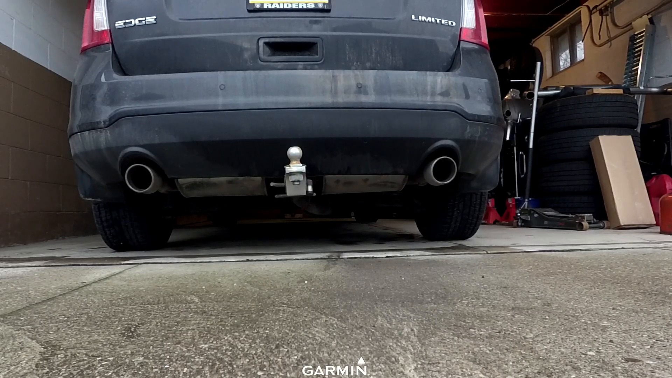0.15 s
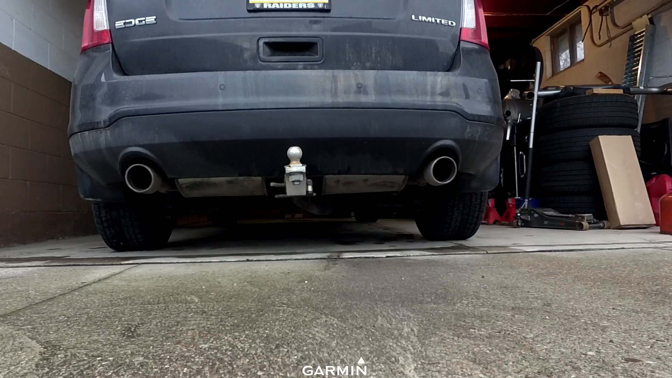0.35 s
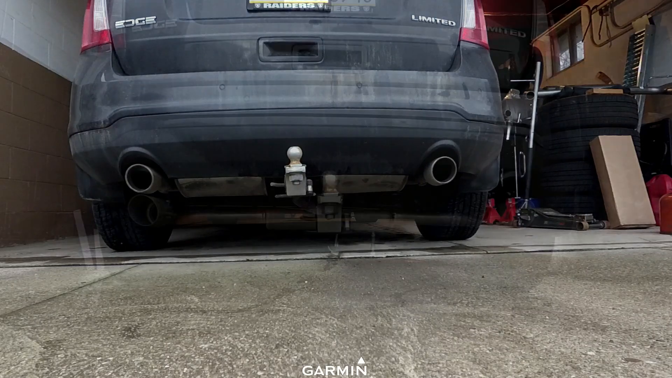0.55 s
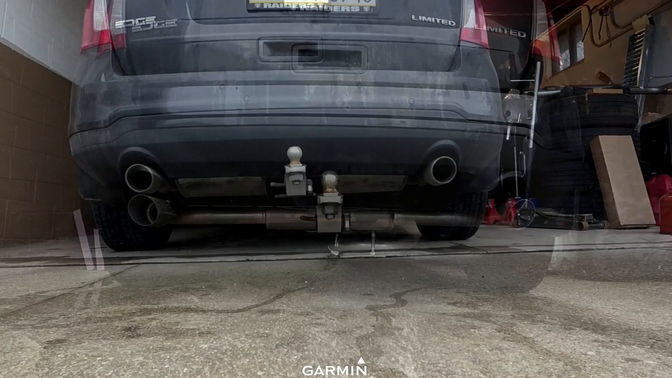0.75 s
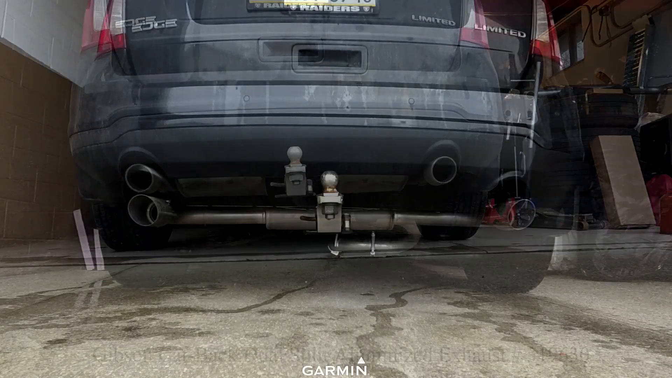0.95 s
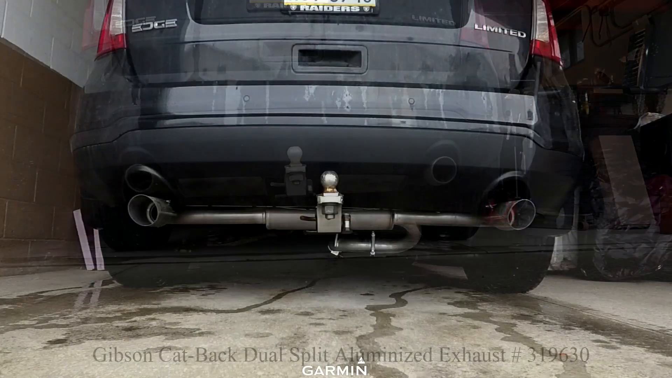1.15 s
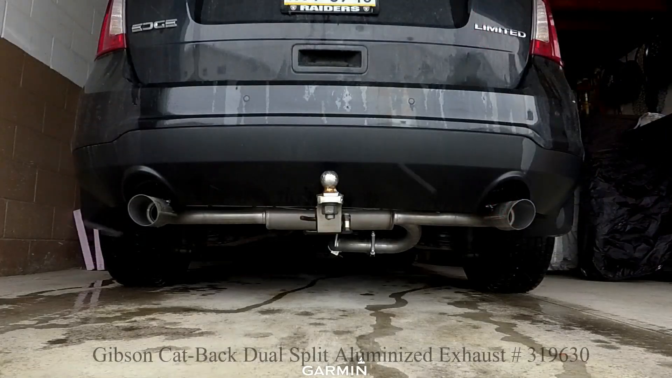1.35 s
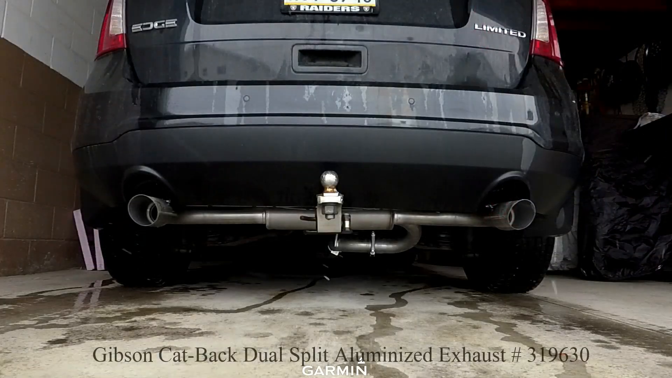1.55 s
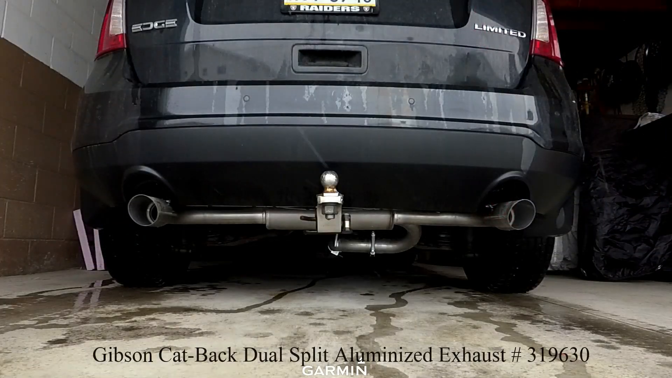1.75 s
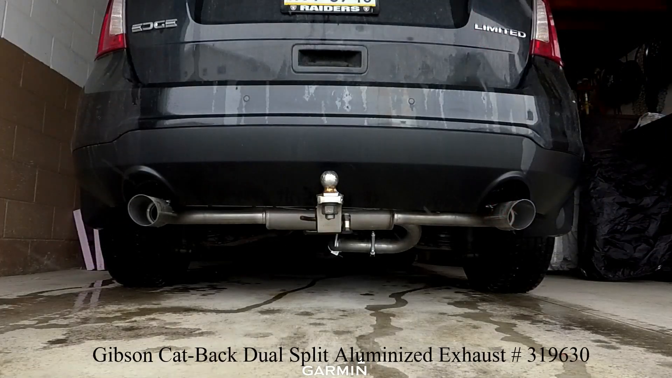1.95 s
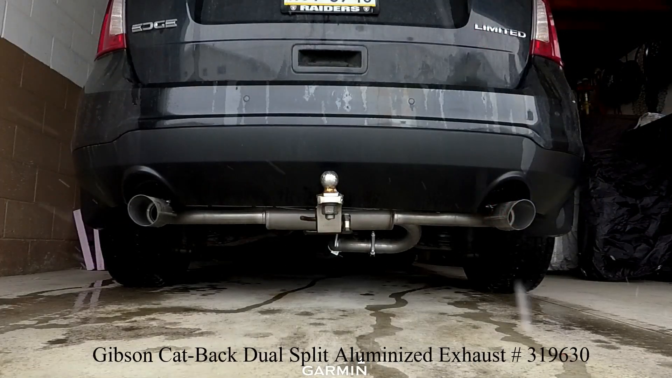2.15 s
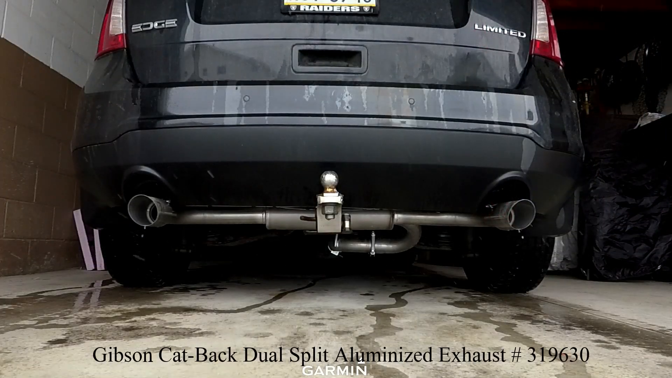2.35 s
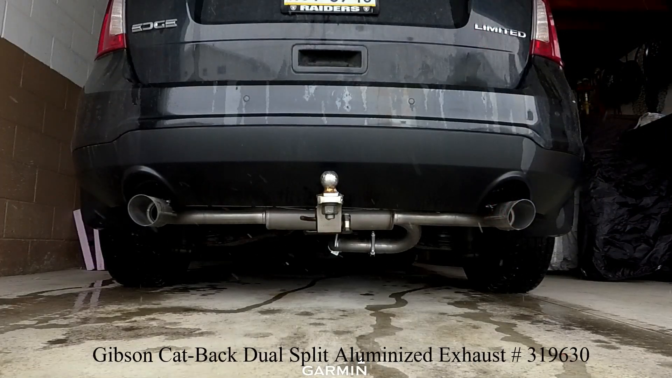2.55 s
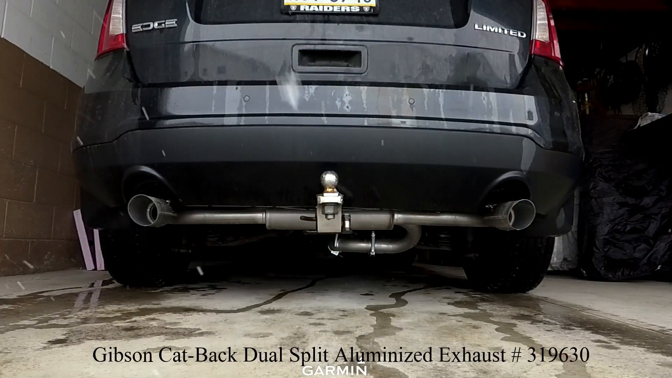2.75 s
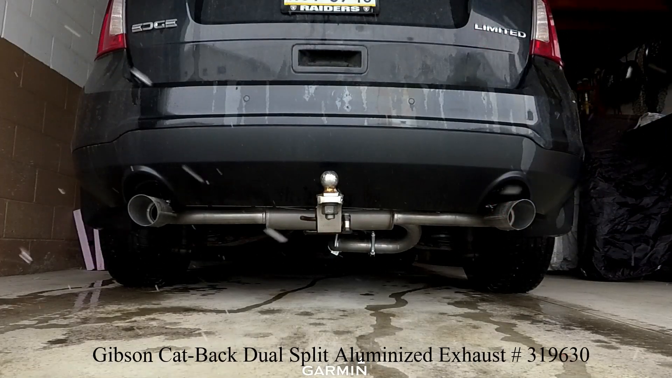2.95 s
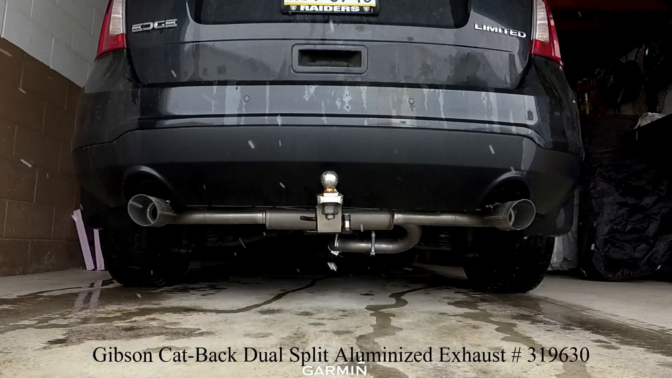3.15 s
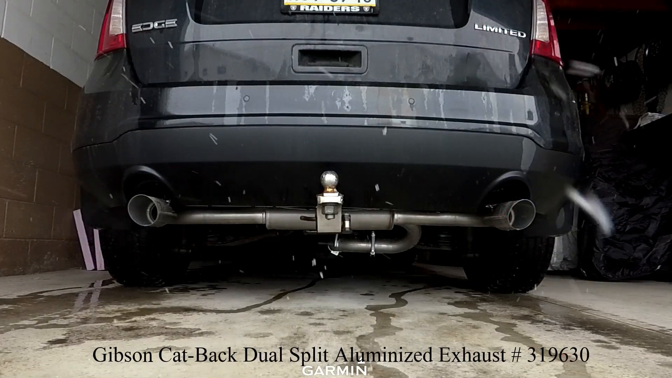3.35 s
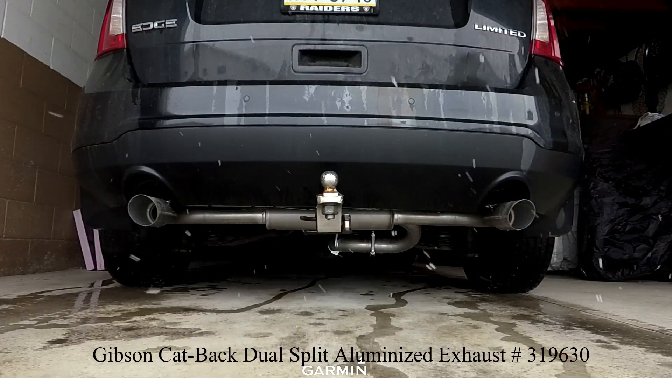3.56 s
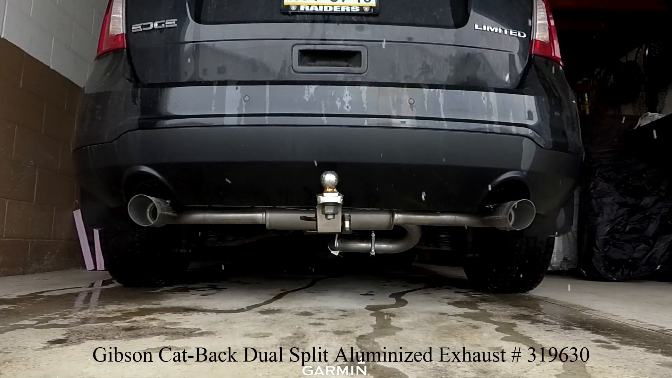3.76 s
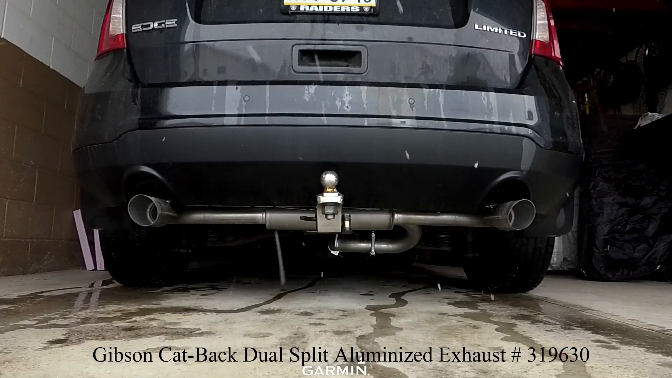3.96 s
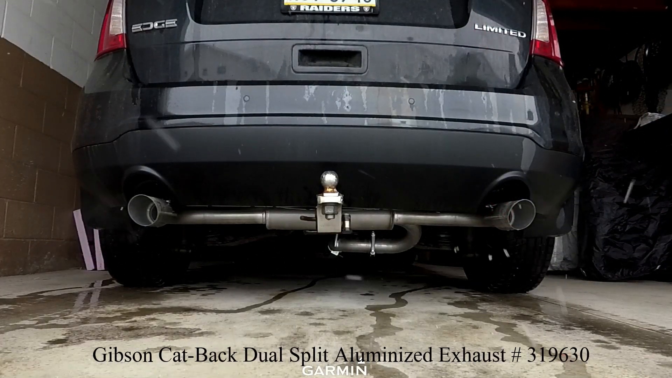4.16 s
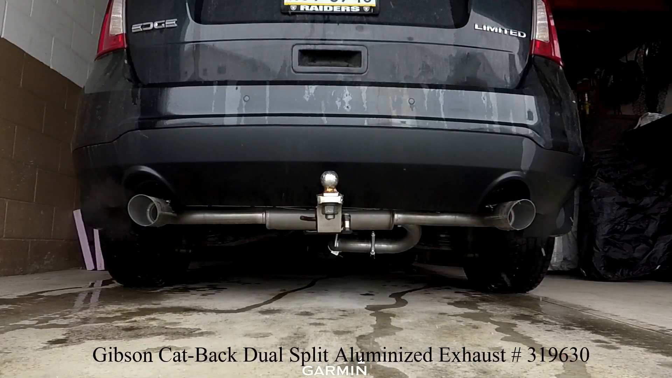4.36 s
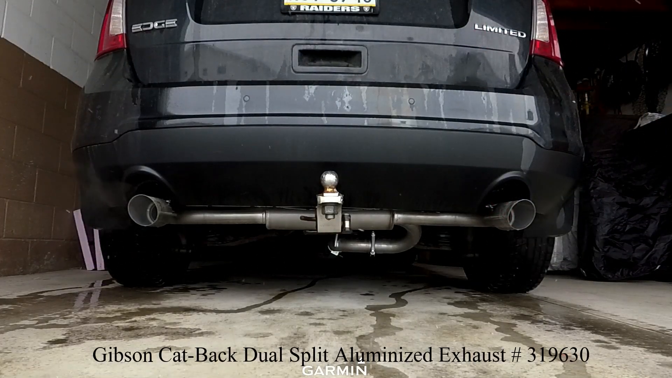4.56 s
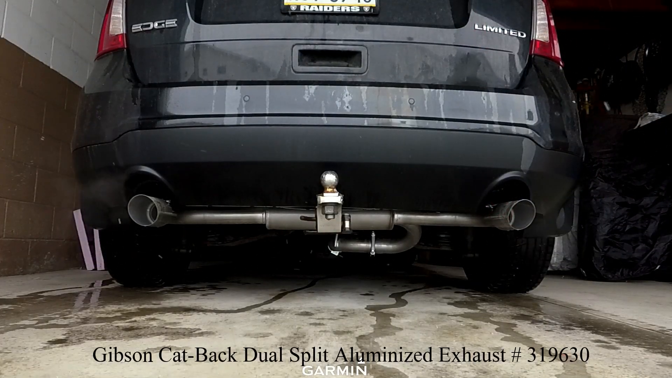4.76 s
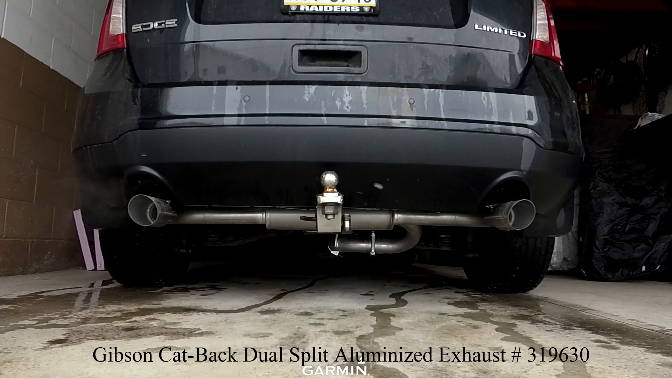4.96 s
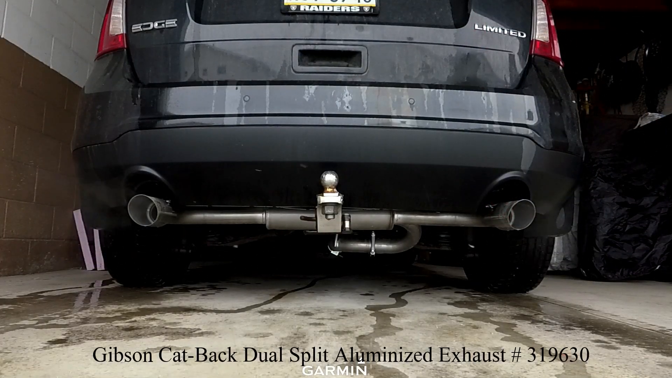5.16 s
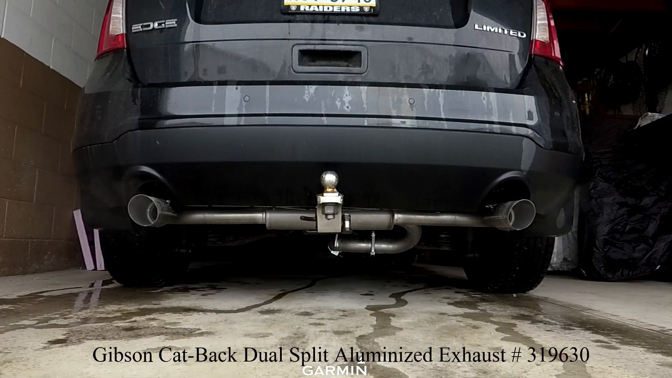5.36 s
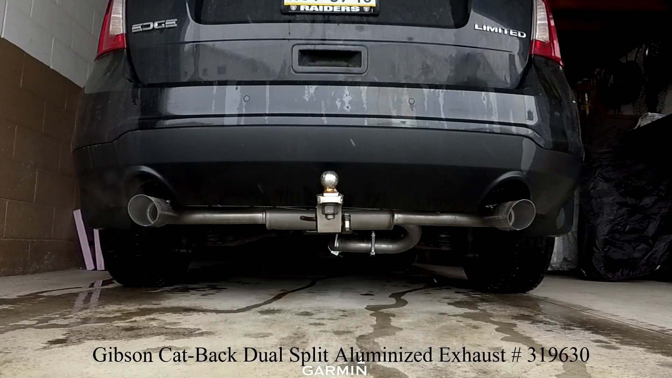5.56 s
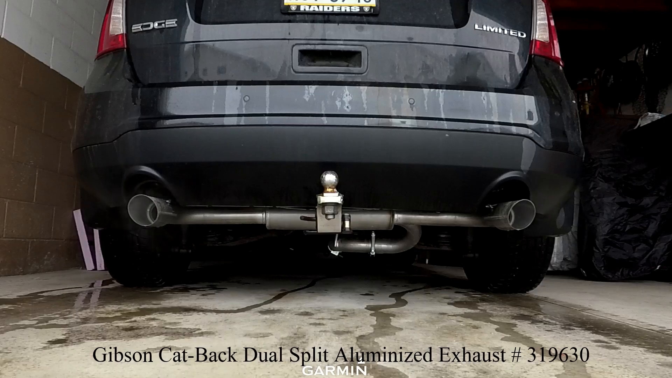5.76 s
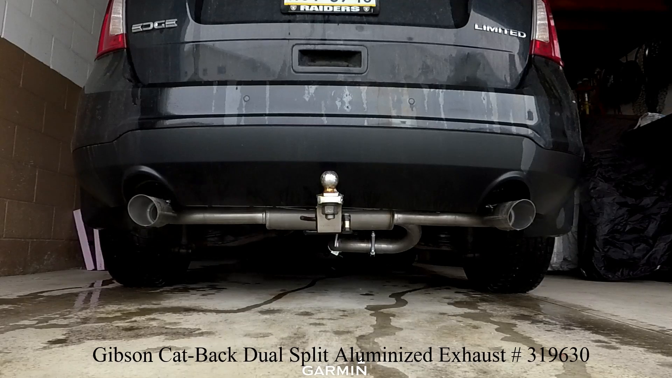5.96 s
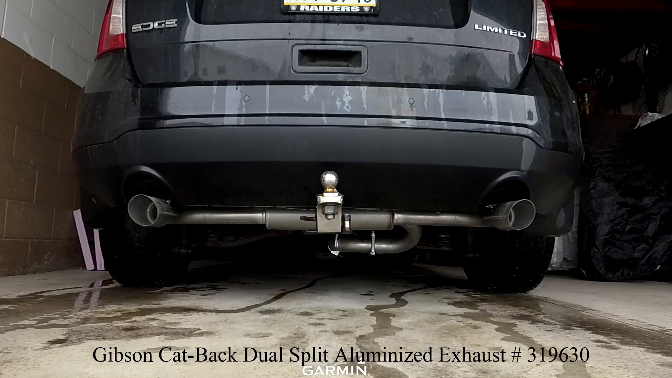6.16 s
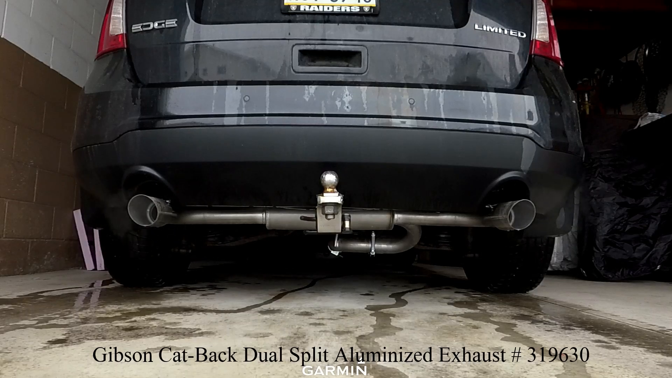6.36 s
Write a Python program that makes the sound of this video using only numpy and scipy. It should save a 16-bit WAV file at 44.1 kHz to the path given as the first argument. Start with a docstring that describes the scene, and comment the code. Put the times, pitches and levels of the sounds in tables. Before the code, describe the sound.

A microphone on the garage floor picks up outdoor air and bumpy gusts, strongest just before an abrupt change to darker air. A metallic starter whirrs and churns briefly. The engine bursts into a raspy roar near the limit of the microphone, drops in pitch and level, then drones steadily at idle, throaty and slightly irregular, with thin high sizzle.

```python
"""A small microphone lies on a garage floor; levels are as they reach it, with no distance modelled.
First, outdoor air washes through the open door as coloured noise; eddies and one-cycle gusts buffet the microphone.
A cut brings duller, darker air; a starter cranks a six-cylinder engine, its grind ringing the gear housing.
The engine catches, flares and sinks to idle: uneven firing pulses drone through the modes of a loud exhaust.
Hiss follows the throttle, and a thin sizzle comes up at idle; faint whines come and go before and after the cut."""
import sys
import numpy as np
from scipy import signal
from scipy.io import wavfile
from scipy.ndimage import uniform_filter1d, minimum_filter1d

SR = 44100
rng = np.random.default_rng(int(sys.argv[2]) if len(sys.argv) > 2 else 0)


def convert_level_to_amplitude(level_db):
    """Map a level in decibels to its linear amplitude factor."""
    exponent = np.asarray(level_db, float) / 20
    return 10 ** exponent


def log_audio(samples):
    """Write samples as a 16-bit WAV file to the path given in sys.argv[1]."""
    # one column per channel
    frames = np.atleast_2d(samples).T
    # limit to full scale, then quantise
    limited = np.clip(frames, -1, 1)
    pcm = np.round(limited * 32767).astype(np.int16)
    wavfile.write(sys.argv[1], SR, pcm)


N = 282240
T = np.arange(N) / SR

# Half lengths run from the middle to 1/e of a bump. Colours are relative levels, per Hz.
CUT_S = 1.429  # the first shot ends here
# outdoor air through the open door, before the cut: f/Hz, level/dB
AIR_COLOUR = [(350, -5.5), (600, 0), (670, -1), (727, 2), (1040, -4.5), (1280, -4.5), (1440, -8),
              (1700, -8), (3990, -15.5), (5180, -25), (14700, -31), (16000, -44.5)]
# duller, darker air after the cut: f/Hz, level/dB
DULL_AIR_COLOUR = [(30, 2), (150, -1), (390, -5), (800, -9), (1400, -15), (1700, -22), (3050, -24),
                   (4300, -28), (4800, -41), (7000, -38), (14800, -41), (16000, -48)]
DULL_AIR_DB = -38
AIR_START_DB, AIR_END_DB, AIR_SETTLE_S = -34.5, -38.5, 0.3  # the wash eases off from its first level

# gusts on the microphone: middle t/s, half length t/s, strength level/dB, small eddies relative level/dB
GUSTS = [(0.052, 0.038, -36, -16), (0.233, 0.019, -33, -22), (.43, 0.019, -45, 4), (0.56, 0.011, -36, -18),
         (0.925, 0.06, -24, -8), (1.049, 0.09, -21, -3), (1.302, 0.083, -24, -18), (1.345, .02, -23, -22),
         (1.4, 0.028, -17.5, -22)]
# sharp single-cycle buffets: t/s, peak level/dB ahead of the microphone's bass cut and limiter, f/Hz
BUFFETS = [(0.549, -17.5, 170), (0.867, -16.5, 323), (0.916, -10.5, 300), (.932, -5, 312),
           (0.978, -11, 199), (1.042, -9, 233), (1.079, -3, 214), (1.098, -10, 330), (1.314, -10, 240),
           (1.377, -11, 198), (4.471, -9.5, 123)]
BREEZE_DB, BREEZE_SMALL_DB = -36.5, -7  # steady wind; its small eddies relative to it
LARGE_EDDIES_DB, LARGE_SWING_DB = -6, -3.5  # the large eddies come and go

# faint high whines: middle t/s, half length t/s, level/dB, middle f/Hz, glide/(Hz per s)
WHINES = [(0.961, 0.24, -61, 5960, 99.6), (3.45, .3, -65.5, 6100, 380), (4.196, .5, -61, 6520, 396)]

# engagement clack, then one groan per compression: t/s, level/dB, t60/s, treble relative level/dB
GROANS = [(1.618, -12.5, 0.42, 6), (1.89, -18, 0.29, 0), (1.988, -15.5, 0.21, -3.5),
          (2.082, -17.5, 0.22, -4), (2.169, -17, 0.29, 0)]
# varying whirr of the starter gear: t/s, level/dB, treble relative level/dB
WHIRR = [(1.612, -35, -5), (1.7, -37, -6), (1.77, -23, 0.5), (1.87, -29.5, 6), (2.25, -27.5, 9.5),
         (2.33, -24, 11.5), (2.39, -28.5, 6), (2.5, -53.5, 10.5)]
# colour of the gear grind: f/Hz, level/dB
GRIND_COLOUR = [(180, -59), (300, -20.5), (494, -7), (613, -15.5), (761, -1.5), (1130, -4), (1270, -0.5),
                (1660, -9), (4080, -13.5), (5070, -25), (10500, -41.5), (14700, -60.5), (16000, -81)]
# resonances of the starter housing: f/Hz, width/Hz ahead of a 0.85 scaling, relative level/dB
HOUSING = [(530, 54, -8.5), (752, 14, -2.5), (994, 27, -6), (1269, 88, 4), (1392, 48, -3.5), (1485, 19, -5),
           (2014, 55, -10), (2130, 29, -8), (2630, 13, -17), (3050, 40, -24), (3032, 33, -7.5),
           (3470, 72, -10.5), (3990, 47, -12), (4340, 35, -9)]
TEETH_PER_S, HOUSING_WAVER_DB = 700, 3.5  # uneven gear knocks, on average; each housing mode comes and goes

# engine speed: t/s, firings/(1 per s)
SPEED = [(2.25, 36.47), (2.4, 61.4), (2.5, 76.63), (2.6, 77.69), (2.72, 77.14), (2.85, 70.66), (3.0, 65.16),
         (3.45, 48.76), (3.6, 44.28), (3.8, 40.46), (4.0, 38.68), (4.25, 37.46), (4.5, 37.62), (4.8, 36.35),
         (5.5, 35.4), (5.9, 34.33), (6.4, 34.62)]
IDLE, FLARE = 35, 78  # firings per second
FIRST_FIRING = .2  # where in its turn the crank stands at the start, in firings
# how hard each firing drives the pipe: t/s, level/dB
THROTTLE = [(2.22, -4.5), (2.28, 3), (2.34, 15), (2.5, 16), (2.7, 13.5), (2.9, 11.5), (3.25, 7.5),
            (3.8, 3.5), (4.05, 4.5), (4.8, 4), (5.9, 2.5), (6.15, 1), (6.4, 4)]
# six cylinders in firing order: crack relative level/dB, extra travel time through the manifold/ms
CYLINDERS = [(-4.5, .01), (2.5, .1), (.4, -.08), (-3.2, .02), (3.4, .1), (.6, -.08)]
# exhaust pipe and silencer modes: f/Hz, width/Hz of one resonator pass, level/dB ahead of sharpness and swells,
# opposition of the two banks 0-1 (negative where the other bank leads)
PIPE = [(34.2, 8.5, -8.5, -0.18), (49.2, 15.7, -4, 0.18), (81, 41, -16.5, 0.97), (110, 48, -11.5, 0.37),
        (150.6, 18.8, -7.5, 0.25), (174.7, 11.9, -4.5, 0.3), (237.9, 20.3, -4.5, 0), (248.5, 10.6, 5, 0.14),
        (262.8, 9.5, 4, 0.13), (276.6, 15, -0.9, -0.13), (318, 9.3, -5.5, 0.56), (329.7, 3.75, -1, 0.45),
        (367.6, 24, -8, 0.61), (437.4, 33.4, -12, -0.85), (481.6, 11.6, -7, -0.68),
        (529.8, 17.8, -8.5, 0.3), (583.2, 36, -7, 0.079), (599.8, 24.8, -5.5, 0.06),
        (625, 18.7, -7.5, 0.16), (715, 6.6, -22.5, 0.28), (761, 6.8, -19, 0.28), (896, 16, -30.5, 0.2)]
SHARP_IDLE, SHARP_FLARE, SHARP_BEND = -1.4, 1.58, 0.19  # sharpness grows with speed: dB per octave; exponent
CATCH_DULL, CATCH_S = -6, 2.32  # the first firings are duller by these dB per octave, until this time
# swells and sags of the silencer chamber's drone: middle t/s, half length t/s, level/dB
DRONE_SWELLS = [(2.78, 0.13, -7), (2.93, .07, 11), (3.1, .04, 1), (3.25, 0.054, 6.5), (4.3, 0.89, 2.5),
                (5.5, 0.065, 3)]
DRONE_DB = -2
# as the throttle shuts, the modes just above the drone boom: middle t/s, half length t/s, level/dB
LIFT_OFF = (3.04, .25, 6.2)
WAVER_DB = 1.9  # each mode above 290 Hz wavers by itself in the unsteady gas
RASP_DB, RASP_HZ = -30, (695, 1150)  # fast gas rasps at the tailpipe

# colour of the running engine's mechanical hiss: f/Hz, level/dB
HISS_COLOUR = [(500, -9.5), (750, -2), (1100, -9), (1600, -12), (2500, -13.5), (4300, -17.5), (4900, -26.5),
               (6700, -28.5), (7400, -37), (11000, -38), (14800, -52), (16000, -59)]
HISS_ON_S, HISS_DB, HISS_FOLLOW = 2.34, -48, 1.253  # start; level at 0 dB throttle; dB per dB of throttle
# the hiss swells briefly: middle t/s, half length t/s, level/dB
HISS_SWELL = (6.4, 0.18, 5)
SETTLE_S, SETTLE_SPREAD_S, SETTLE_HISS_DB = 3.57, 0.28, 6  # the hiss comes forward as the idle settles
# resonances of the thin sizzle: f/Hz, width/Hz of one resonator pass, relative level/dB
SIZZLE = [(9320, 1900, -0.5), (9700, 2200, -8.5)]
SIZZLE_DB = -52  # at idle
# one brief flick of the sizzle: middle t/s, half length t/s, level/dB
SIZZLE_FLICK = (6.34, .025, 6)


def evened(x):
    """Scales to rms 1."""
    return x / np.sqrt(np.mean(x ** 2) + 1e-20)


def columns(rows):
    """Each column of a curve table, per sample, and a mask for its span."""
    s, *cols = np.transpose(rows)
    span = 1. * (T >= s[0]) * (T <= s[-1])
    return [np.interp(T, s, c) for c in cols] + [uniform_filter1d(span, size=100)]


def bump(s, half_s):
    """A smooth rise and fall around s."""
    return np.exp(-((T - s) / max(half_s, .005)) ** 2)


def band(x, lo_hz, hi_hz, order=3):
    """Band-pass."""
    return signal.sosfilt(signal.butter(order, [lo_hz, hi_hz], "band", fs=SR, output="sos"), x)


def resonate(x, hz, width, count=2):
    """A decaying mode; applied twice it has steep skirts and a soft start."""
    r = np.exp(-np.pi * width / SR)
    for _ in range(count):
        x = signal.lfilter([1 - r], [1, -r * np.exp(2j * np.pi * hz / SR)], x)
    return 2 * x.real


def smooth_twice(x, size):
    """Two running means leave a slow, rounded wander."""
    return uniform_filter1d(uniform_filter1d(x, size=size), size=size)


def mode_wavers(count, size):
    """An independent slow random wander for each mode, per sample."""
    steps = rng.standard_normal((N // 256 + 1, count))
    steps = evened(uniform_filter1d(steps, size=size, axis=0)).T
    return [np.interp(T, np.arange(len(w)) * 256 / SR, w) for w in steps]


def noise(spectrum, patchy_db):
    """Random short-time spectra of a given colour, with drifting patches."""
    hz = np.fft.rfftfreq(1024, 1 / SR)
    f, db = np.transpose(spectrum)
    a, b, patches = rng.standard_normal((N // 256 + 5, 513, 3)).T
    patches = evened(uniform_filter1d(uniform_filter1d(patches, size=12, axis=0), size=8, axis=1))
    colour_db = np.interp(np.log(hz + 1), np.log(f + 1), db)[:, None]
    z = (a + 1j * b) * convert_level_to_amplitude(colour_db + patchy_db * patches)
    return evened(signal.istft(z, nperseg=1024, noverlap=768)[1][:N])


def air():
    """The outdoor wash is broadband noise, replaced by a duller, darker one at the cut."""
    level_db = AIR_END_DB + (AIR_START_DB - AIR_END_DB) * np.exp(-T / AIR_SETTLE_S)
    first = convert_level_to_amplitude(level_db) * noise(AIR_COLOUR, patchy_db=0.86)
    dull = convert_level_to_amplitude(DULL_AIR_DB) * noise(DULL_AIR_COLOUR, patchy_db=0.6)
    return np.where(T < CUT_S, first, dull)


def wind():
    """Lumpy low turbulence in three sizes of eddy up to the cut, plus single-cycle buffets."""
    strength = convert_level_to_amplitude(BREEZE_DB) + sum(convert_level_to_amplitude(db) * bump(s, half) for s, half, db, _ in GUSTS)
    small = convert_level_to_amplitude(BREEZE_DB + BREEZE_SMALL_DB)
    small = small + sum(convert_level_to_amplitude(db + small_db) * bump(s, half) for s, half, db, small_db in GUSTS)
    white, lumps, swing = rng.standard_normal((3, N))
    swing = evened(smooth_twice(swing, 1500))
    large_eddies = evened(band(white, 27.5, 73)) * convert_level_to_amplitude(LARGE_EDDIES_DB + LARGE_SWING_DB * swing)
    middle_eddies = evened(band(white, 78, 180))
    small_eddies = evened(band(white, 212, 365))
    eddies = strength * (middle_eddies + large_eddies) + small * small_eddies
    lumps_db = 1.7 * evened(smooth_twice(lumps, 400))
    out = convert_level_to_amplitude(lumps_db) * eddies * (T < CUT_S)
    for s, db, hz in BUFFETS:
        start = round(s * SR) - 600
        cycles = (T[start:][:1200] - s) * hz
        out[start:][:1200] += convert_level_to_amplitude(db) * np.cos(2 * np.pi * cycles) * np.exp(-(cycles / 0.55) ** 2)
    return out


def whines():
    """Faint gliding tones that waver slightly in level and pitch."""
    out = np.zeros(N)
    for s, half, db, hz, glide in WHINES:
        level, bend = evened(uniform_filter1d(rng.standard_normal((2, N)), size=700))
        pitch = hz + glide * (T - s) + 35 * bend
        out += bump(s, half) * convert_level_to_amplitude(db + 3 * level) * np.sin(2 * np.pi * np.cumsum(pitch) / SR)
    return out


def starter():
    """Gear grind rings the housing; each compression loads the gear and the grind swells and dies."""
    grind = noise(GRIND_COLOUR, patchy_db=2.0)
    size, draw = rng.standard_normal(N), rng.random(N)
    teeth = size * (draw < TEETH_PER_S / SR)
    ring = np.zeros(N)
    for (hz, width, db), waver in zip(HOUSING, mode_wavers(len(HOUSING), 14)):
        ring += convert_level_to_amplitude(db + HOUSING_WAVER_DB * waver) * evened(resonate(teeth, hz, 0.85 * width))
    body = grind + convert_level_to_amplitude(-4.5) * evened(ring)
    treble = signal.sosfilt(signal.butter(2, 2500, "high", fs=SR, output="sos"), body)
    whirr_db, bright_db, on = columns(WHIRR)
    low, high = on * convert_level_to_amplitude(whirr_db), on * convert_level_to_amplitude(whirr_db + bright_db)
    for s, db, t60, shine_db in GROANS:
        age = np.maximum(T - s + 0.0098, 0)  # the swell starts just ahead of its listed time
        swell = convert_level_to_amplitude(db - 60 * age / t60) * (1 - np.exp(-(age / 0.01) ** 2))
        low, high = low + swell, high + swell * convert_level_to_amplitude(shine_db)
    return low * (body - treble) + high * treble


def effort():
    """Engine speed from 0 at idle to 1 at the top of the flare."""
    return np.clip((columns(SPEED)[0] - IDLE) / (FLARE - IDLE), 0, 1)


def exhaust():
    """One pressure pulse per firing, uneven between cylinders, with turbulent puffs, through the pipe modes."""
    rate, _ = columns(SPEED)
    level_db, on = columns(THROTTLE)
    speed = effort()
    sharp_db = SHARP_IDLE + (SHARP_FLARE - SHARP_IDLE) * speed ** SHARP_BEND
    sharp_db += CATCH_DULL / (1 + np.exp((T - CATCH_S) / 0.0067))
    drone_db = DRONE_DB + sum(db * bump(s, half) for s, half, db in DRONE_SWELLS)
    boom_db = LIFT_OFF[2] * bump(*LIFT_OFF[:2])

    firings = np.floor(np.cumsum(rate) / SR - FIRST_FIRING)
    at = np.flatnonzero(np.diff(firings))
    cylinder = firings[at + 1].astype(int) % 6
    crack_db, late_ms = np.array(CYLINDERS)[cylinder].T
    chance = rng.standard_normal((len(at), 3))
    late_ms = late_ms + .003 * rate[at] * chance[:, 0]
    late = np.minimum(at + np.round(late_ms * SR / 1000).astype(int), N - 1)
    push, crack, bank = np.zeros((3, N))
    push[at] = convert_level_to_amplitude(.6 * chance[:, 1]) / np.sqrt(rate[at])  # the slow push has no cylinder pattern
    crack[late] = convert_level_to_amplitude(crack_db + .8 * chance[:, 2]) / np.sqrt(rate[at])
    bank[at] = bank[late] = (-1.) ** cylinder  # the banks take turns

    puff_envelope = signal.lfilter([1], [1, -np.exp(-1 / (0.014 * SR))], crack)  # dies over 14 ms
    puffs = evened(puff_envelope * rng.standard_normal(N))
    rough = .18 + .65 * speed  # faster gas is more turbulent
    push, crack = evened(push), evened(crack)
    wavers = mode_wavers(len(PIPE), 10)
    lower_modes, upper_modes = np.zeros((2, N))
    for k, (hz, width, db, opposed) in enumerate(PIPE):
        angle = np.clip(opposed, -1, 1) * np.pi / 2
        banks = np.cos(angle) + np.sin(angle) * bank
        slow, upper = hz < 220, hz > 400
        drive = (push if slow else crack) * banks + (.5 if slow else 1) * rough * puffs
        mode_db = db + sharp_db * np.log2(hz / 260)  # a sharper pulse drives the higher modes harder
        if 220 < hz < 290:  # the modes that make the drone
            mode_db = mode_db + drone_db
        if 290 < hz < 400:
            mode_db = mode_db + boom_db
        if hz > 290:
            mode_db = mode_db + WAVER_DB * wavers[k]
        # the short upper modes start at once with each pulse
        ring = resonate(drive, hz, width, count=1 if upper else 2)
        modes = upper_modes if upper else lower_modes
        modes += (-1) ** k * convert_level_to_amplitude(mode_db) * ring
    rasp = convert_level_to_amplitude(RASP_DB) * speed * band(puffs, *RASP_HZ)
    return on * convert_level_to_amplitude(level_db) * (lower_modes + band(upper_modes, 375, 1030) + rasp)


def settled():
    """The settling of the idle, a smooth step from 0 to 1."""
    return 1 / (1 + np.exp((SETTLE_S - T) / SETTLE_SPREAD_S))


def engine_hiss():
    """Valve gear, belts and intake air as coloured noise that follows the throttle."""
    hiss_db = HISS_DB + HISS_FOLLOW * columns(THROTTLE)[0] + SETTLE_HISS_DB * settled()
    hiss_db += HISS_SWELL[2] * bump(*HISS_SWELL[:2])
    fade_in = np.clip((T - HISS_ON_S) / 0.03, 0, 1)
    return fade_in * convert_level_to_amplitude(hiss_db) * noise(HISS_COLOUR, patchy_db=0.38)


def idle_sizzle():
    """White noise through high resonances, flickering in level as it comes up at idle."""
    white, flicker = rng.standard_normal((2, N))
    sizzle = sum(convert_level_to_amplitude(db) * resonate(white, hz, width) for hz, width, db in SIZZLE)
    s, half, flick_db = SIZZLE_FLICK
    sizzle_db = SIZZLE_DB + flick_db * bump(s, half) + 0.98 * evened(uniform_filter1d(flicker, size=900))
    return settled() ** 2 * convert_level_to_amplitude(sizzle_db) * evened(sizzle)


def scene():
    """All sources sum at one microphone."""
    return (air() + wind() + whines() + starter() + exhaust() + engine_hiss() + idle_sizzle())[None]


def band_limit(x):
    """A steep low-pass at the top of the band."""
    return signal.sosfilt(signal.butter(12, 16110, fs=SR, output="sos"), x)


def record(dry):
    """The microphone drops the deepest bass; a limiter holds the loudest pulses, whose tips still clip."""
    heard = signal.sosfilt(signal.butter(3, 24, "high", fs=SR, output="sos"), dry)
    limiter_gain = minimum_filter1d(1 / np.maximum(abs(heard) / 1.12, 1), size=121)
    held = heard * smooth_twice(limiter_gain, 61)
    finished = np.clip(held, -1, 1)
    return band_limit(finished)


dry = scene()
out = record(dry)
log_audio(out)
```